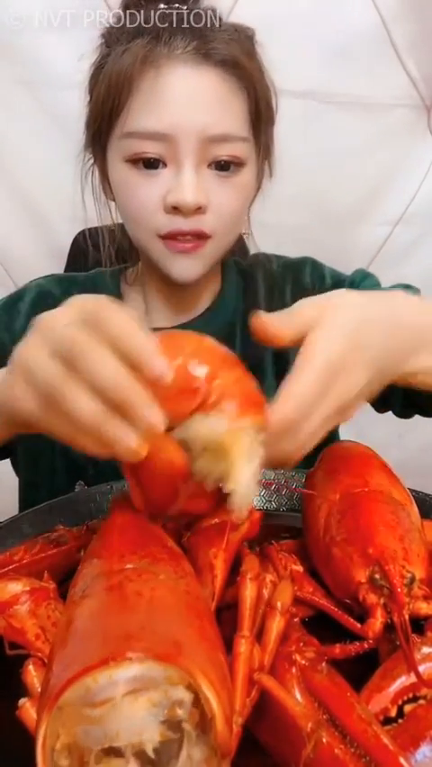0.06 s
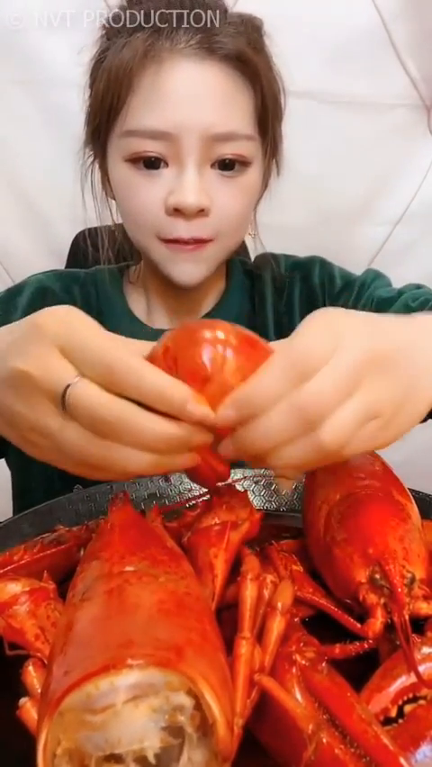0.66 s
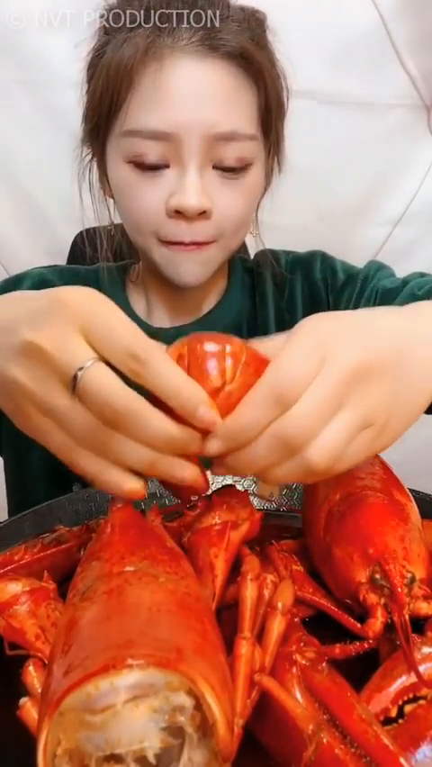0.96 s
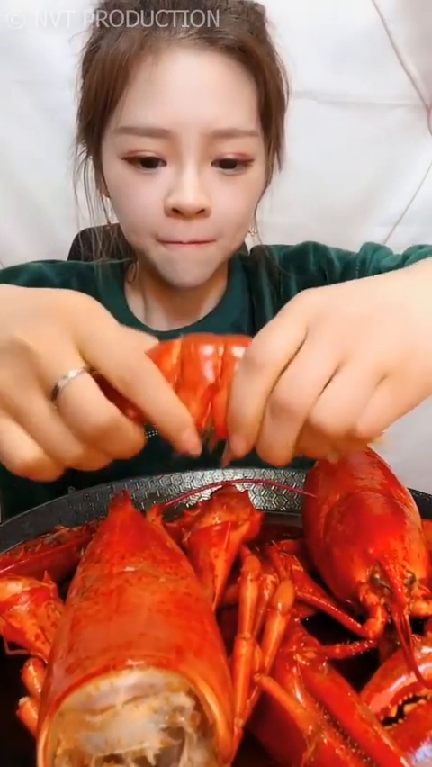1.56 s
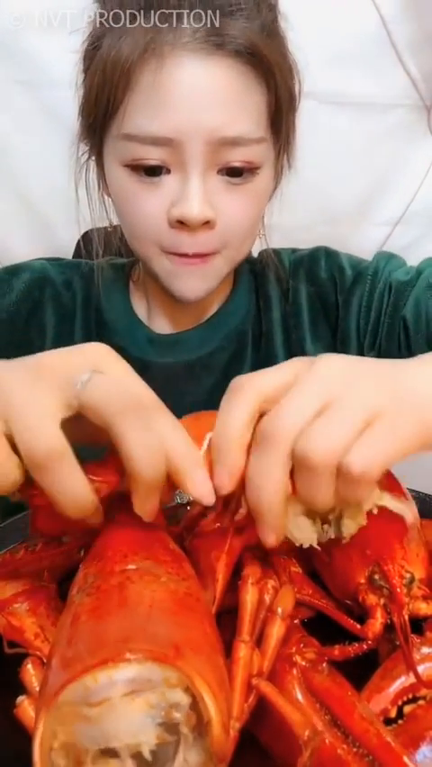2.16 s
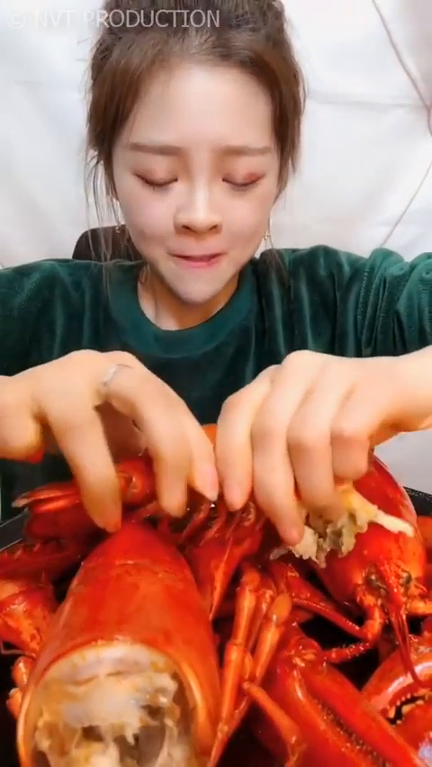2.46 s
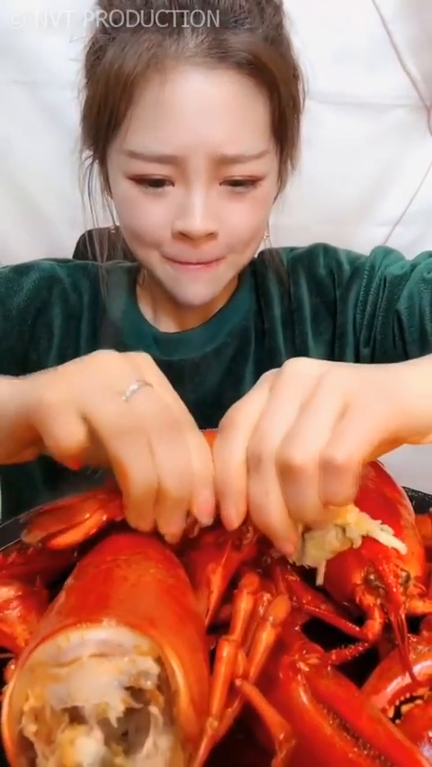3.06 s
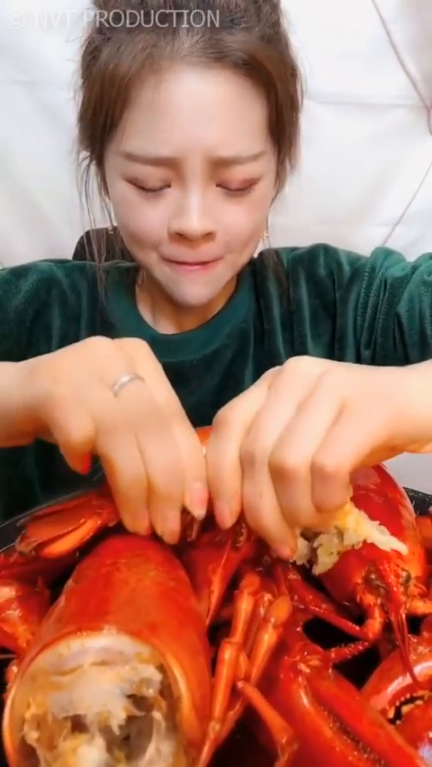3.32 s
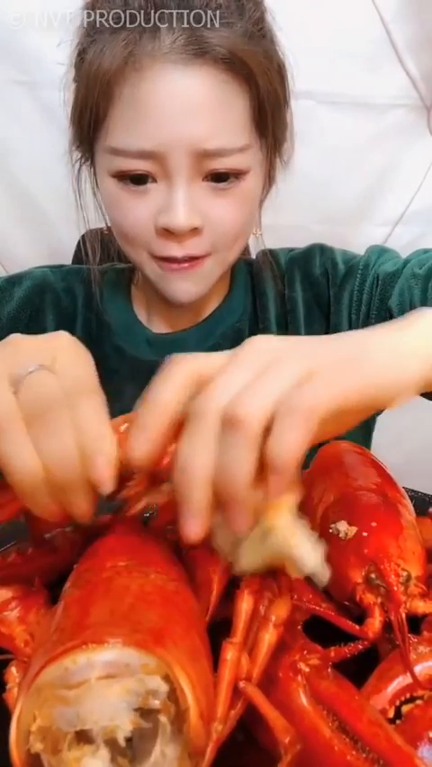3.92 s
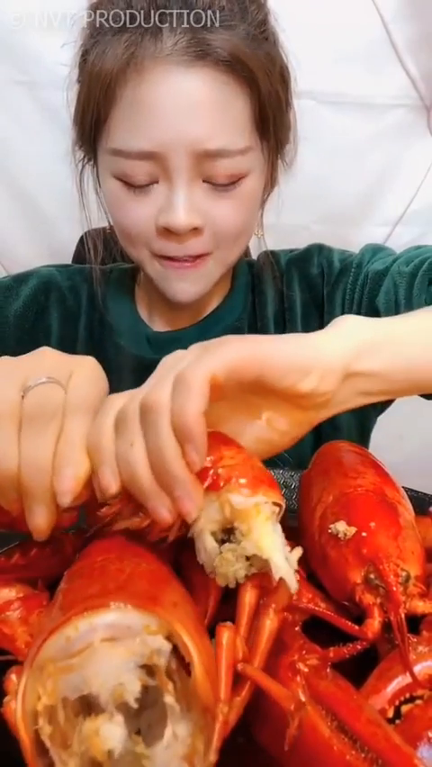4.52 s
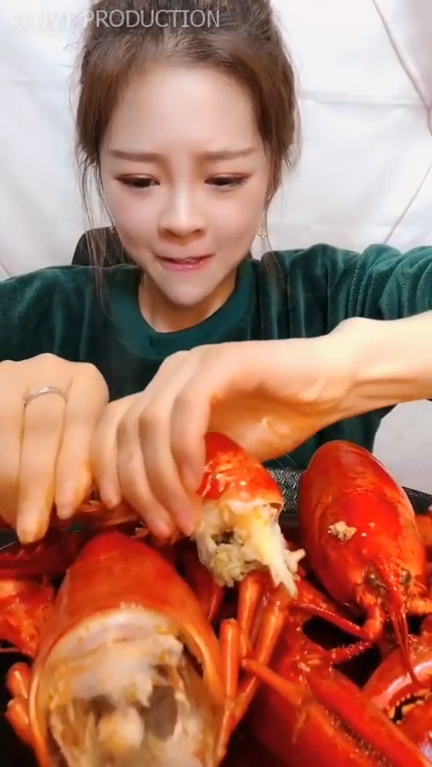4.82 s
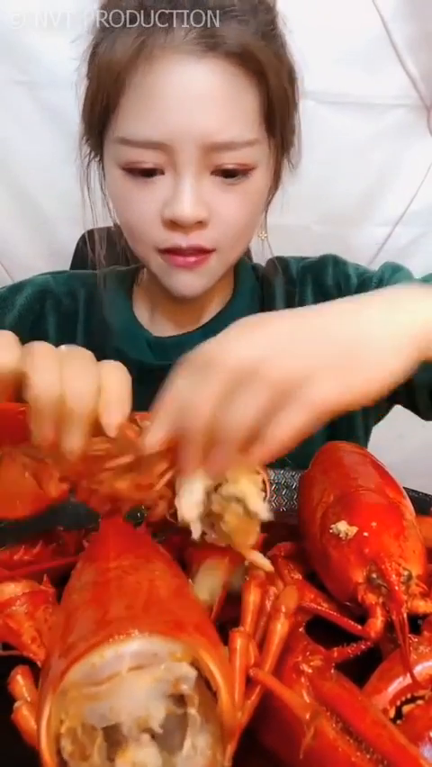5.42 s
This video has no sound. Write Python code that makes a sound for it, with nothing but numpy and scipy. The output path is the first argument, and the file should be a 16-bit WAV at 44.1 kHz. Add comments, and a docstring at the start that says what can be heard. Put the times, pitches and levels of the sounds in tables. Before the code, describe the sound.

Fingers work at a cooked lobster tail close to the microphone, making faint wet ticks, dull hollow knocks and a few tiny cracks. About halfway through, the shell gives way in four loud, sharp cracks at uneven intervals, most with a soft thud of meat and hands. Smaller cracks and ticks trail off. A low ventilation hum and soft hiss fill the small room throughout.

```python
"""Hands bend a cooked lobster tail close to the microphone, in a small room with a low steady hum. First the
fingers work at the shell: wet ticks, dull knocks on the hollow tail, a few faint cracks. From just before 3 s
to 5 s it gives way in loud cracks, most with a soft thud of meat and hands. Each crack is a quick run of tiny
fractures that rings the damped shell for a few milliseconds, and the walls answer. Small cracks and ticks trail
off over the hum."""
import sys
import numpy as np
from scipy import signal
from scipy.fft import rfft, irfft
from scipy.io import wavfile

SR = 44100
rng = np.random.default_rng(int(sys.argv[2]) if len(sys.argv) > 2 else 0)


def generate_wav(signal):
    """Clip the signal to [-1, 1] and save it as 16-bit WAV at the path in sys.argv[1]."""
    frames = np.transpose(np.atleast_2d(signal))
    scaled = np.clip(frames, -1, 1) * 32767
    pcm = np.round(scaled).astype(np.int16)
    wavfile.write(sys.argv[1], SR, pcm)


N = 246078

# Soft hiss of the room. Each row: frequency in Hz, relative spectral level in dB.
HISS_SPECTRUM = [(180, -36.5), (300, -7), (372, -1.5), (494, -17.5), (555, -10), (787, -10), (1060, -18),
                 (1360, -13.5), (1510, -22), (2250, -25.5), (2650, -27), (4090, -29.5), (11300, -41.5),
                 (14500, -47), (16000, -55.5)]
# Low resonances of the room's hum. Each row: centre in Hz, width in Hz, level in dB.
HUM_RESONANCES = [(49.05, 11, -61), (110, 18, -61.5), (153.4, 45, -66), (203.6, 29.2, -63),
                  (279, 58, -64.5), (378, 83, -64.5), (760, 120, -79), (1337, 160, -77)]
# Tail from the walls. Each row: frequency in Hz, reflected energy in dB, t60 in seconds.
WALL_BANDS = [(200, 2, 0.2), (450, -9.5, 0.12), (1000, -10, 0.22), (2720, -6.5, 0.27), (6270, -11, 0.29),
              (10000, -8, 0.22), (14980, -14.5, 0.45)]
# Zones of the shell, from the hollow tail to the splinters. Each row: low edge in Hz, high edge in Hz.
SHELL_ZONES = [(720, 1400), (1600, 2350), (2500, 5080), (4500, 8400), (8400, 16500)]
# How well the shell radiates. Each entry: one zone's gain in dB, in the same order.
ZONE_RADIATION_DB = [-1.2, -1.2, 0.74, 1.3, -1.2]
# Modes of the shell. Each row: frequency in Hz, relative level in dB, t60 in seconds.
SHELL_MODES = [(849, 4, 0.0087), (1153, 2.5, 0.0071), (1395, -6.5, 0.022), (1700, -1, 0.0073),
               (1818, 2, 0.0035), (2708, 2.5, 0.0059), (3066, 4, 0.0029), (3700, -2.5, 0.0034),
               (4770, 0, 0.007), (5650, -7, 0.0055), (6000, -7.5, 0.0086), (7500, -2, 0.0043),
               (8490, 0.5, 0.0061), (9430, -4, 0.0061), (10640, -9, 0.0039), (12100, -9, 0.0032),
               (13560, -0.5, 0.00075), (16000, -3.5, 0.0024)]
# Fingers shift on the wet shell. Each row: start in seconds, end in seconds, extra ticks per second.
GRIP_SHIFTS = [(0.241, .39, 45), (1.1, 1.55, 8.7), (2.05, 2.8, 7.7), (4.1, 4.6, 39), (5.18, 5.58, 16.4)]
# Jolts of meat and hands as the shell gives way. Each row: start in seconds, level in dB.
MEAT_THUDS = [(2.85, -56), (3.217, -50), (4.938, -49.5), (4.955, -48.5)]
# Fingers knock on the hollow tail. Each row: start in seconds, level in dB, tilt in dB per octave.
FINGER_KNOCKS = [(0.2675, -54.5, -4), (0.329, -47, -11.5), (1.1407, -42.5, -9.5), (1.2325, -63, -2.5),
                 (1.6826, -54, -11), (1.7174, -59.5, -4), (2.105, -45.5, -6), (2.4072, -47, -4),
                 (4.128, -57, -4), (4.1491, -44, -7.5), (4.201, -56, -3.5), (4.5647, -51.5, -7),
                 (4.7698, -53.5, -9.5), (4.9157, -50.5, -3.5)]
# Cracks at the microphone. Each row: start in seconds, level in dB, lowest pitch of the breaking piece
# in Hz, tilt above it in dB per octave, dip at its octave in dB, room send in dB.
SHELL_CRACKS = [(0.173, -61.5, 1950, -4, 0, 6.5), (0.281, -56, 1000, -1, -1, 2.5),
                (1.4351, -42.5, 5840, -2.5, 3.5, -7.5), (1.495, -54.5, 2400, -9, 6, 0),
                (2.782, -46.5, 1000, -0.5, 1, -4.5), (2.83, -47.5, 1000, 0, 2, 4.5),
                (2.85, -23, 1000, -3, -3.5, -5), (2.878, -45, 2550, 2, -1, -0.5),
                (3.2162, -17.5, 1000, -1.78, 6, -0.5), (3.282, -38.5, 1000, -3, 2.5, 8),
                (3.601, -45.5, 2450, 0, 20.5, 0), (3.6526, -63.5, 3270, 1.5, -2.5, 1.5),
                (3.6789, -44.5, 1950, -2, 1, 3.5), (3.688, -21.5, 3170, 0.24, 11, -6),
                (4.2387, -38, 1000, -1, 5.5, -1), (4.3202, -57.5, 3270, -1.5, -1, -11.5),
                (4.374, -64, 3255, -3, 3, -4), (4.4866, -54.5, 3270, -9, 3.5, 3),
                (4.5, -58.5, 5735, -5.5, 1, 6), (4.936, -23, 1000, 1, 12, -7),
                (4.9533, -25, 1000, -3, 5, 2.5), (5.202, -52, 1000, -0.5, 4.5, 7.5),
                (5.225, -60.5, 1950, 5, 5, 7.5), (5.236, -42, 1700, -0.6, 8, -6.5),
                (5.2674, -35.5, 1000, -0.53, -3, -2.5), (5.4912, -57.5, 1000, 2.8, 7.5, 2.5),
                (5.5634, -45.5, 1930, 1, -2, 2)]

RING_S = .04  # time allowed for one ring of the shell
TEAR_S, TEAR_PIECE_HZ = .00055, 1000  # tearing time of a piece of this pitch; smaller pieces part sooner


def undb(db):
    """Decibels to gain."""
    return 10 ** (np.asarray(db) / 20)


def unit(x):
    """Scale to unit energy."""
    return x / np.sqrt(np.sum(x ** 2) + 1e-30)


def band(x, lo_hz, hi_hz):
    """Causal second-order band-pass, applied to the spectrum."""
    f = np.fft.rfftfreq(len(x), 1 / SR) + 1e-9
    s = 1j * (f ** 2 - lo_hz * hi_hz) / (f * (hi_hz - lo_hz))
    return irfft(rfft(x) / (s ** 2 + np.sqrt(2) * s + 1), len(x))


def noise(gain, db):
    """Noise with the given gain per frequency bin, at an rms level."""
    return unit(irfft(rfft(rng.standard_normal(N)) * gain, N)) * np.sqrt(N) * undb(db)


def add(out, start_s, x):
    """Mix x into out from the given time on."""
    k = max(int(start_s * SR), 0)
    out[k:k + len(x)] += x[:max(len(out) - k, 0)]


def flatten(x, rough=0.053):
    """Level out the spectrum of a short burst: a ragged break favours no pitch."""
    spectrum = rfft(x, 2 * len(x))
    power = abs(spectrum) ** 2
    return irfft(spectrum / np.sqrt(power + rough * power.mean()))[:len(x)]


def room_tone(hiss_db=-58.5):
    """Steady room tone behind the hands: soft hiss, and a low hum gathered in the room's low resonances."""
    f = np.fft.rfftfreq(N, 1 / SR) + 1
    hz, db = np.transpose(HISS_SPECTRUM)
    hiss = noise(undb(np.interp(np.log(f), np.log(hz), db)), hiss_db)
    hum = sum(noise(1 / (1 + 2 * ((f - centre) / width) ** 2), level_db)
              for centre, width, level_db in HUM_RESONANCES)
    return hiss + hum


def room(x, table_db=-21, table_s=0.009, wall_delay_s=.0095, build_s=0.0035):
    """What comes back to the microphone: weak scatter off the table, then a dense tail off the walls."""
    t = np.arange(SR // 2) / SR
    late = np.maximum(t - wall_delay_s, 0)
    log_hz = np.log(np.fft.rfftfreq(len(t), 1 / SR) + 1)
    log_centres = np.log(np.array(WALL_BANDS)[:, 0])
    wall_spectrum = rfft(rng.standard_normal(len(t)))
    response = undb(table_db) * unit(rng.standard_normal(len(t)) * t * np.exp(-t / table_s))
    for (_, db, t60), this_band in zip(WALL_BANDS, np.eye(len(WALL_BANDS))):
        reflections = irfft(wall_spectrum * np.interp(log_hz, log_centres, this_band), len(t))
        envelope = (1 - np.exp(-late / build_s)) * np.exp(-np.log(1000) * late / t60)
        response += undb(db) * reflections * unit(envelope)
    return signal.fftconvolve(x, response)[:N]


def fracture(tear_s, aftershock=.5, count=14):
    """Force of one crack: a first break, then ever smaller ones as the split runs on."""
    force = np.zeros(int(RING_S * SR))
    lag = 3 * (np.arange(count) + rng.random(count)) / count  # in tearing times
    at = np.clip(lag * tear_s * SR, 1, len(force) - 1).astype(int)
    np.add.at(force, at, aftershock * rng.standard_normal(count) * np.exp(-lag / 2))
    force[0] = 1
    return flatten(force)


def shell_ring(shares_db, force_s, detune=0.033, scatter_db=1.5, grit=1.1, grit_s=0.0027, grit_step_db=3):
    """A quick run of impulses rings the damped shell; where it lands sets each zone's share."""
    t = np.arange(int(RING_S * SR)) / SR
    hz, db, t60 = np.transpose(SHELL_MODES)
    # the grip changes the modes a little from ring to ring
    pitch_shift, level_shift = rng.standard_normal((2, len(hz)))
    phase = 2 * np.pi * (hz * (1 + detune * pitch_shift))[:, None] * t
    # neighbouring modes swing against each other, so the ring takes a moment to swell
    gain = (-1) ** np.arange(len(hz)) * undb(db + scatter_db * level_shift)
    modes = gain[:, None] * np.sin(phase) * np.exp(-np.log(1000) * t / t60[:, None])
    zone_of = np.argmin(abs(np.log(hz[:, None]) - np.log(SHELL_ZONES).mean(axis=1)), axis=1)
    # crumbling edges fill the gaps between the modes, most of all among the splinters
    crumbs = flatten(rng.standard_normal(len(t)) * np.exp(-t / grit_s))
    ring = 0
    for k, ((lo, hi), share_db) in enumerate(zip(SHELL_ZONES, shares_db)):
        tones = unit(band(modes[zone_of == k].sum(axis=0), lo, hi))
        grit_gain = grit * undb(-grit_step_db * (len(SHELL_ZONES) - 2 - k))
        crumbling = grit_gain * unit(band(band(crumbs, lo, hi), lo, hi))
        ring += (-1) ** k * undb(share_db + ZONE_RADIATION_DB[k]) * unit(tones + crumbling)
    sound = signal.fftconvolve(unit(fracture(force_s)), ring)[:len(t)]
    return sound * np.sqrt(.005 * SR)  # unit energy becomes unit rms over 5 ms


def wet_ticks(level_db=-63.5, spread_db=3.5, hold_per_s=2.5, zone_step_db=-4.5, colour_db=1, tear_s=.00089):
    """Faint ticks of fingers and meat sticking to the shell, more of them while the grip shifts."""
    out = np.zeros(N)
    t = np.arange(N) / SR
    rate = hold_per_s + sum(per_s * ((t > start) & (t < end)) for start, end, per_s in GRIP_SHIFTS)
    zones = np.arange(len(SHELL_ZONES))
    for start_s in np.flatnonzero(rng.random(N) < rate / SR) / SR:
        shares_db = zone_step_db * zones + colour_db * rng.standard_normal(len(zones))
        gain = undb(level_db + spread_db * rng.standard_normal())
        add(out, start_s, gain * shell_ring(shares_db - shares_db.max(), tear_s))
    return out


def thuds(lo_hz=120, hi_hz=280, t60_s=0.072):
    """Soft bumps of meat and hands as the tension lets go; their level is the rms over 20 ms."""
    out = np.zeros(N)
    t = np.arange(SR // 4) / SR
    for start_s, db in MEAT_THUDS:
        jolt = flatten(rng.standard_normal(len(t)) * np.exp(-np.log(1000) * t / t60_s))
        add(out, start_s, undb(db) * unit(band(jolt, lo_hz, hi_hz)) * np.sqrt(.02 * SR))
    return out


def zone_octaves(hz):
    """How far each zone of the shell lies above a pitch, in octaves."""
    return np.log2(SHELL_ZONES).mean(axis=1) - np.log2(hz)


def knocks(push_s=.0013, send_db=1.5):
    """Dull blows of the fingers, which ring the hollow tail most and the higher zones less."""
    above_hollow = zone_octaves(np.sqrt(np.prod(SHELL_ZONES[0])))
    for start_s, db, tilt_db in FINGER_KNOCKS:
        yield start_s, db, tilt_db * above_hollow, push_s, send_db


def cracks(below_db_per_oct=19, dip_width_oct=0.37):
    """Blows of breaking pieces: each rings from its lowest pitch up; a mid-piece break dips the octave."""
    for start_s, db, piece_hz, tilt_db, dip_db, send_db in SHELL_CRACKS:
        octaves = zone_octaves(piece_hz)
        slope = np.where(octaves < 0, below_db_per_oct, tilt_db)
        octave_dip = dip_db * np.exp(-((octaves - 1) / dip_width_oct) ** 2)
        tear_s = TEAR_S * np.sqrt(TEAR_PIECE_HZ / piece_hz)
        yield start_s, db, slope * octaves - octave_dip, tear_s, send_db


def breaking_shell(wall_paths=4):
    """Each crack and knock radiates differently each way: one path to the microphone, several to walls."""
    direct, to_walls = np.zeros(N), np.zeros((wall_paths, N))
    for start_s, db, shares_db, force_s, send_db in [*cracks(), *knocks()]:
        add(direct, start_s, undb(db) * shell_ring(shares_db, force_s))
        for path in to_walls:
            add(path, start_s, undb(db + send_db) * shell_ring(shares_db, force_s))
    return direct + sum(room(path) for path in to_walls) / np.sqrt(wall_paths)


def scene():
    """One microphone close to the shell and hands, with the small room and its hum behind."""
    hands = wet_ticks() + thuds()
    return (breaking_shell() + hands + room(hands) + room_tone())[None]


def record(dry):
    """The recorder cuts the top octave's upper end steeply."""
    top_hz = 15900
    return signal.sosfilt(signal.ellip(8, .2, 70, top_hz, fs=SR, output="sos"), dry)


dry = scene()
out = record(dry)
generate_wav(out)
```